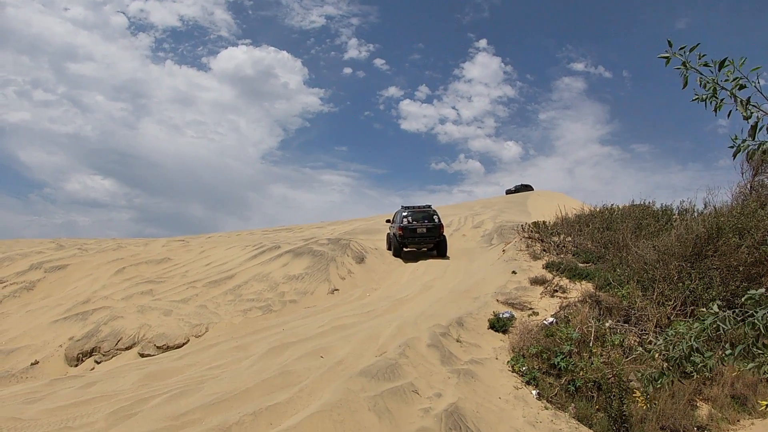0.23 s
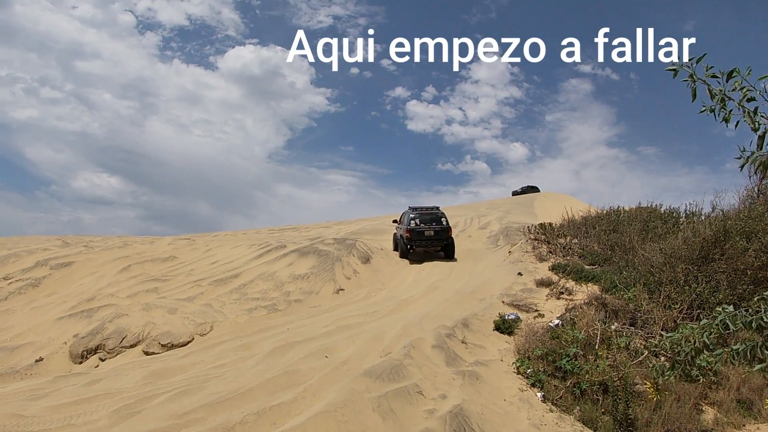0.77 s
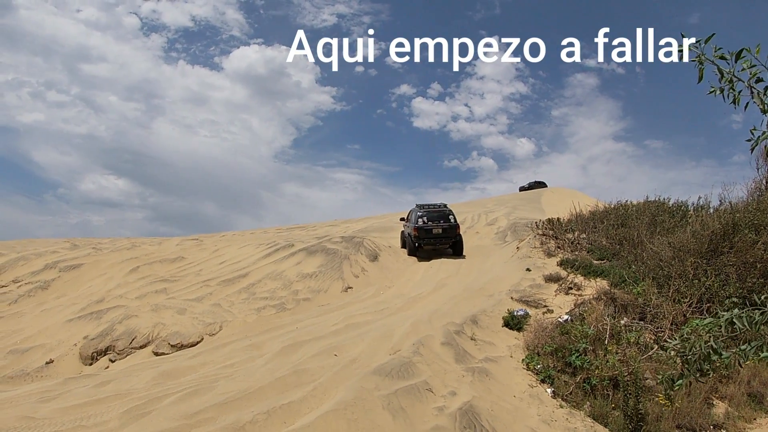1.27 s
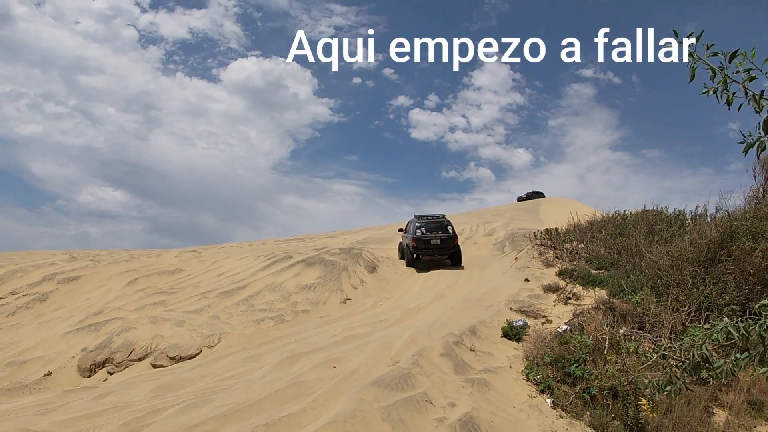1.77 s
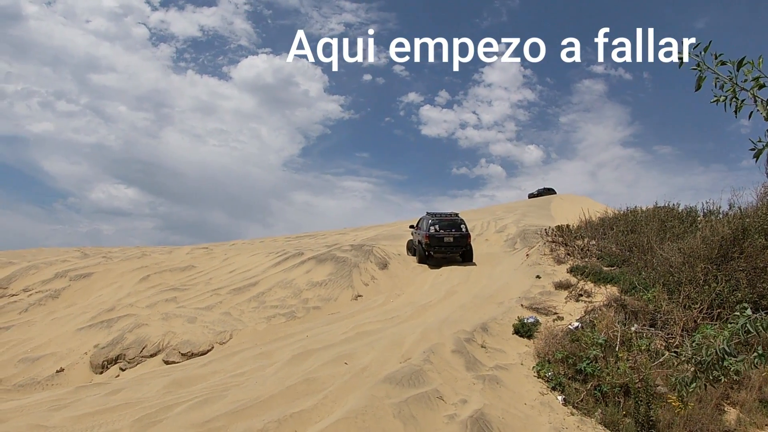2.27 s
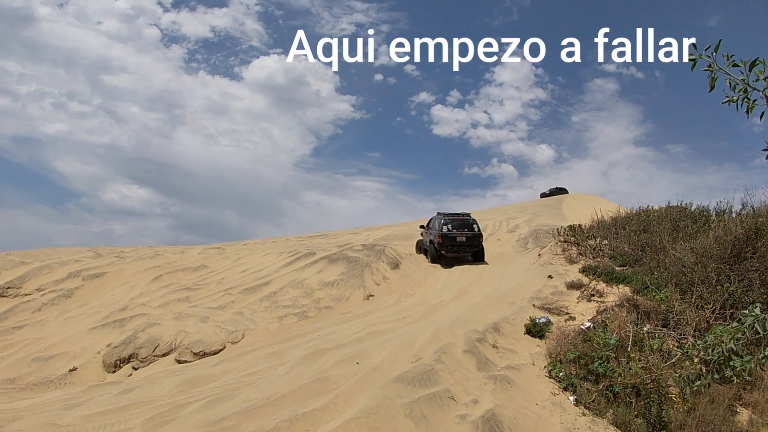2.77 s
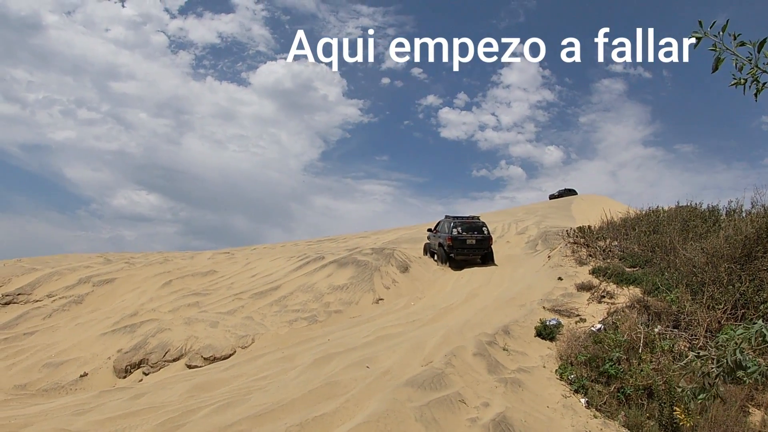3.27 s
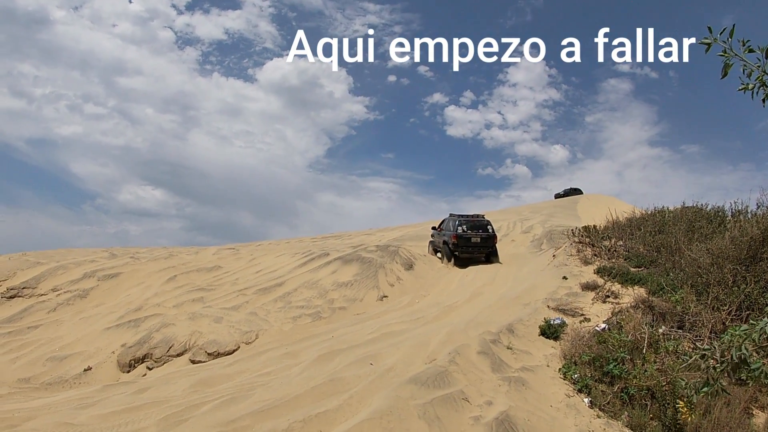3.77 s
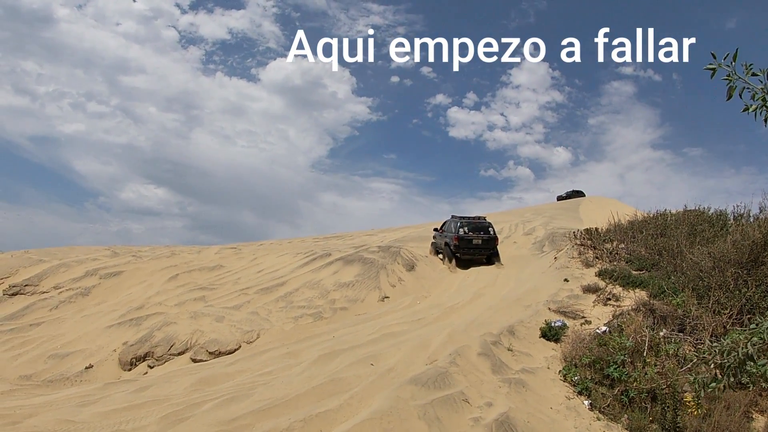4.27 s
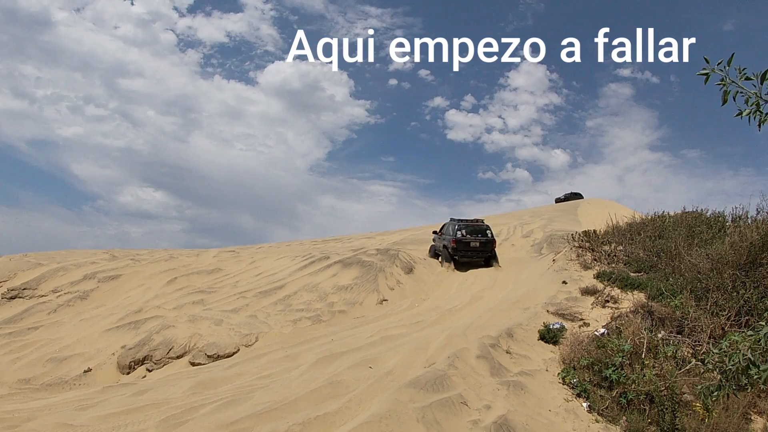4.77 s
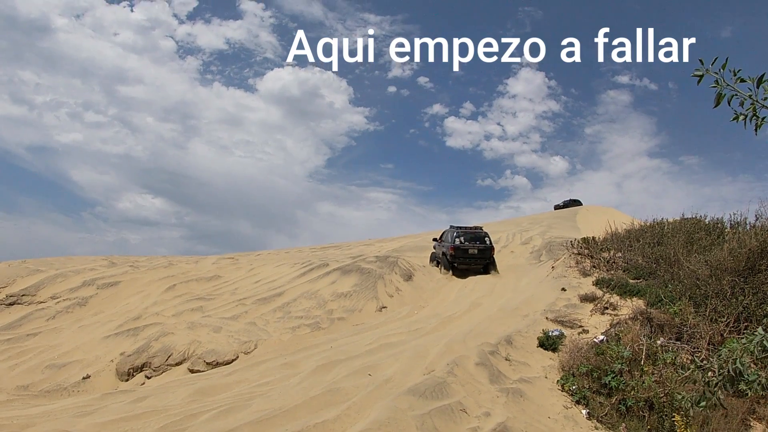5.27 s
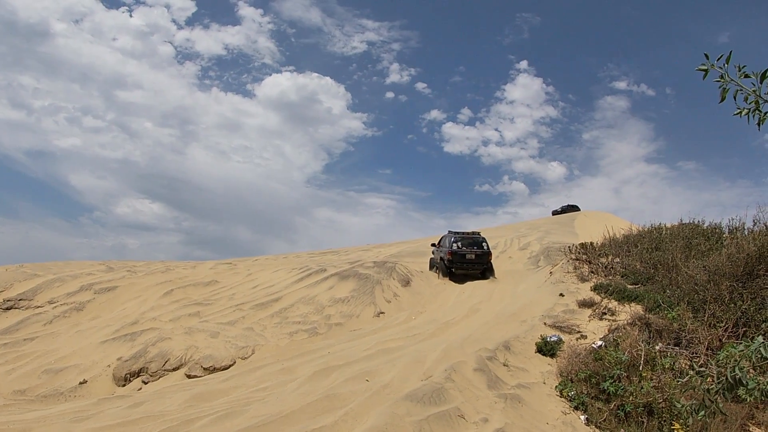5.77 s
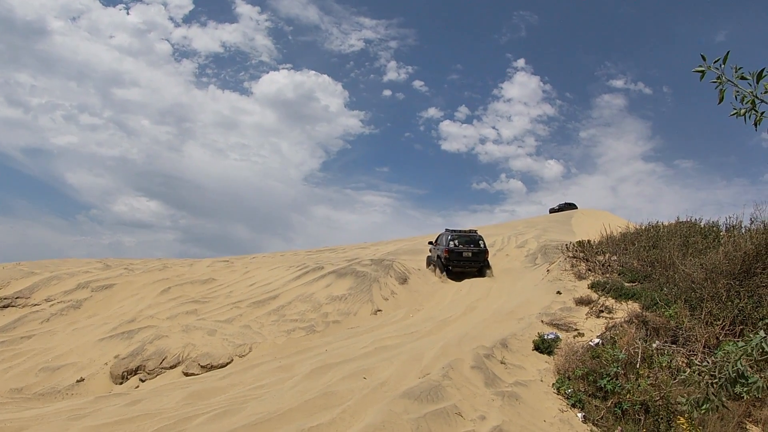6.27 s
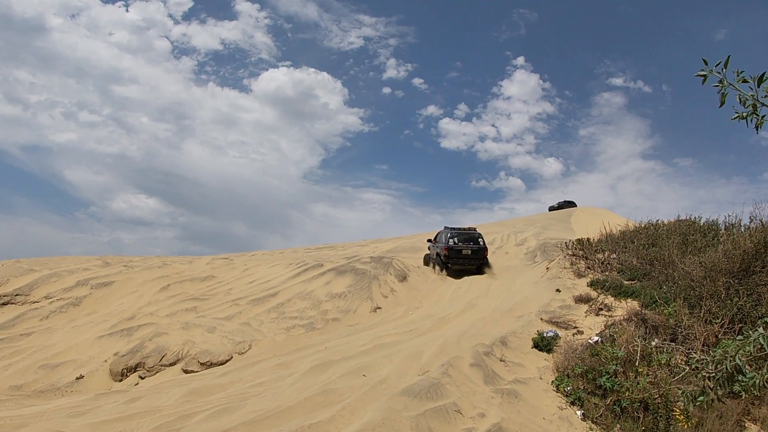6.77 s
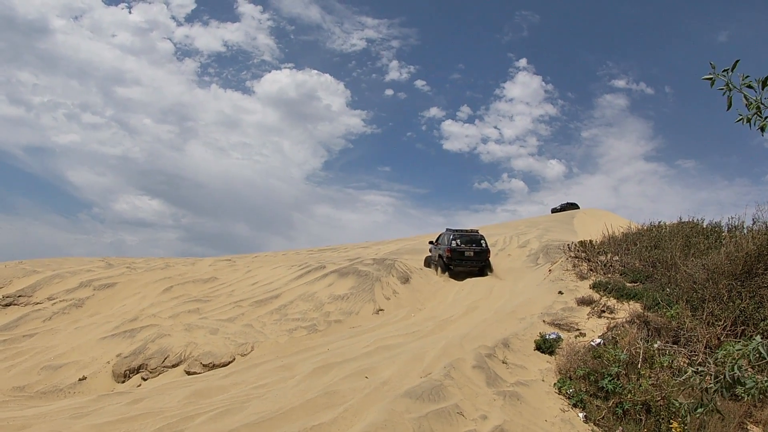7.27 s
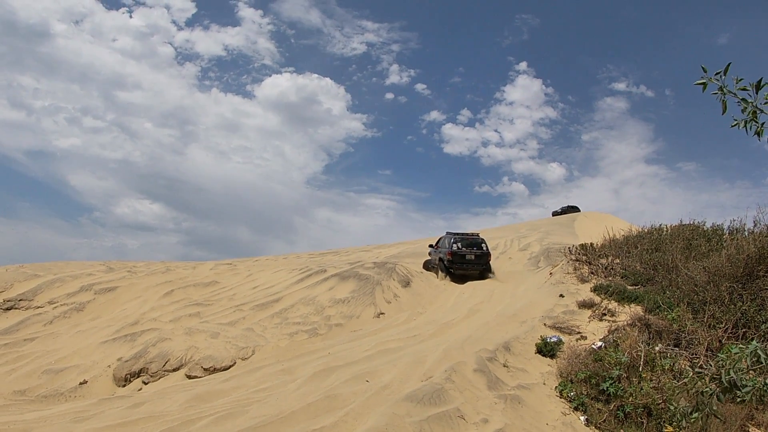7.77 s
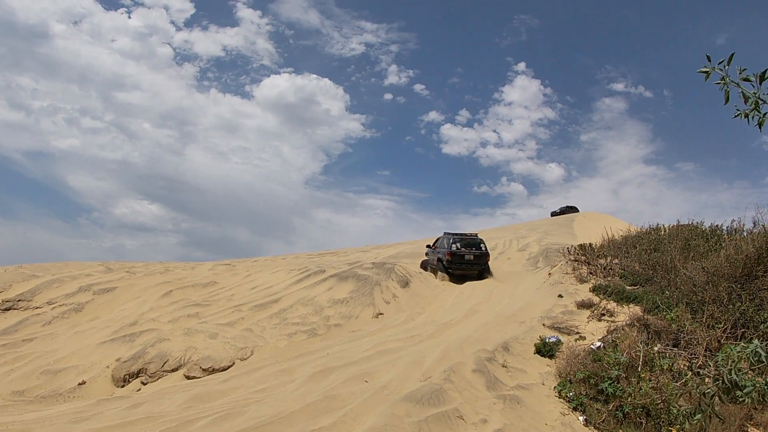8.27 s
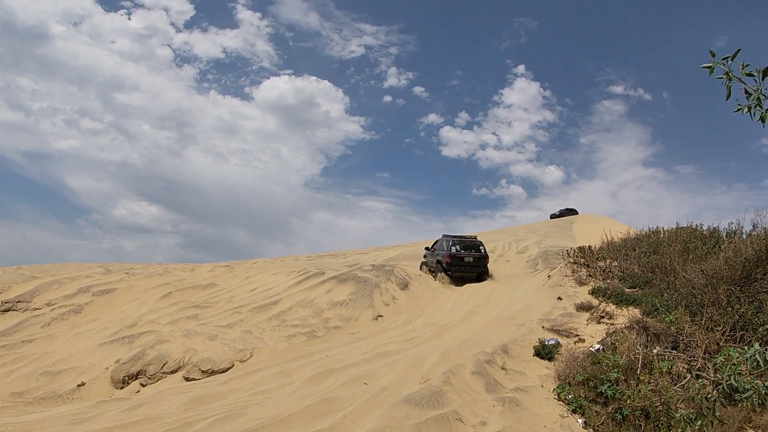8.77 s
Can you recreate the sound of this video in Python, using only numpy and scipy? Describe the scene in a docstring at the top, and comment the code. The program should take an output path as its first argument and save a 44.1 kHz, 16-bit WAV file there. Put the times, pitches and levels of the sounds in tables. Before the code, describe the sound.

A big engine growls low amid body knocks, climbs in pitch, starts misfiring at three seconds, and holds a rough, popping roar over sand.

```python
"""Off-roader climbing a dune

An eight-cylinder engine, heard from on board, lugs over a few bumps, then revs up and is held high.
Firing pulses ring the pipe as boom and rasp; from about three seconds one cylinder misfires, so the
boom stutters once a cycle, with a growl of cycle overtones and short noise pops.
Shaped noise and engine-cycle patterns make the rush and the hissing sand; faint wavering sines run along.
Damped sines thump the body over rumbling noise; noise bursts are twigs and grit ticking on it."""
import sys
import numpy as np
from scipy import signal
from scipy.fft import rfft, irfft
from scipy.io import wavfile
from scipy.ndimage import uniform_filter1d

SR = 44100
rng = np.random.default_rng(int(sys.argv[2]) if len(sys.argv) > 2 else 0)


def output_pcm(signal):
    """Save a mono or channel-first signal as 16-bit PCM at the path in sys.argv[1].

    Samples are clipped to [-1, 1] before scaling.
    """
    pcm = np.clip(np.atleast_2d(signal).T, -1, 1) * 32767
    wavfile.write(sys.argv[1], SR, np.round(pcm).astype(np.int16))


N = 398223
TIME = np.arange(N) / SR

# engine speed over the climb: t/s, firing rate f/Hz
FIRING = [(0.0, 47.03), (0.16, 44.68), (0.63, 51.29), (1.32, 47.23), (1.7, 55.04), (2.0, 82.95),
          (2.46, 81.6), (2.94, 102.13), (3.83, 139.88), (4.33, 144.89), (4.92, 142.87), (5.53, 146.77),
          (5.66, 128.92), (6.06, 150.77), (6.54, 155.72), (7.25, 155.16), (8.15, 151.84), (9.03, 161.55)]
CRUISE_HZ = 150  # firing rate at cruising revs


def firing_rate():
    """Firings per second: every cylinder's combustion counts once."""
    return curve(FIRING)


def octaves():
    """Engine speed in octaves above cruising revs."""
    return np.log2(firing_rate() / CRUISE_HZ)


# one cylinder fails quickly, then slowly gets worse (depth: 0 healthy, 1 failing)
FAULT_START_S, FAULT_ONSET_S, FAULT_DEPTH, FAULT_GROWTH_PER_S = 3.06, 0.26, 0.99, 0.035


def misfire():
    """Depth of the misfire: a quick onset, then slow growth."""
    since = TIME - FAULT_START_S
    onset = np.clip(since / FAULT_ONSET_S, 0, 1)
    return onset * (FAULT_DEPTH + FAULT_GROWTH_PER_S * since)


# the engine briefly loses power: t/s, half width/s, drop in level/dB
STUMBLES = [(1.69, .035, 3.5), (5.645, .08, 3.5)]


def stumble_db():
    """Power lost in the stumbles, as a level change in dB."""
    return -sum(db * swell(s, width) for s, width, db in STUMBLES)


# cylinders in firing order: lateness/firing intervals, healthy pulse size, failing pulse size,
# failing rasp level/dB (sizes and levels relative to each other)
CYLINDERS = [(.01, .93, .61, -2), (0, 1.18, .87, -4), (-.02, .87, 1.0, -8), (-.01, 1.0, .9, -6),
             (-.02, 1.02, -.3, -18), (.055, .88, 1.04, 3), (-.01, .93, .36, 1), (-.015, 1.07, 1.31, -1)]


def firings(crank, healthy, failing, shape, scatter):
    """One pulse a firing, sized by its cylinder and by chance; neighbours overlap."""
    late, fault = np.array(CYLINDERS)[:, 0], misfire()
    chance, out = rng.standard_normal(N), np.zeros(N)
    for step in (-1, 0, 1):
        number = np.floor(crank).astype(int) + step
        cylinder = number % len(late)
        size = healthy[cylinder] + fault * (failing - healthy)[cylinder]
        pulse = shape(crank - number - late[cylinder])
        out += size * (1 + scatter * chance[number]) * pulse
    return out


# resonance of exhaust pipe and cab: f/Hz, relative level/dB
PIPE = [(15, -40.5), (35, -7.5), (55, -1), (80, 0.5), (115, 6.5), (150, 4), (195, -6), (225, -10),
        (260, -29.5), (300, -50.5), (420, -89.5), (700, -100)]
# the boom grows with the revs until the engine pulls at full load, where it has BOOM_DB
BOOM_DB, BOOM_DB_PER_OCTAVE, FULL_LOAD_HZ = -14.8, 6.5, 103


def exhaust_boom(crank, blowdown=0.11, uneven=0.04):
    """Blow-down pulses ring the pipe and cab; combustion is less even at low speed."""
    _, healthy, failing, _ = np.transpose(CYLINDERS)
    speed = firing_rate()

    def blow(u):  # u and blowdown in firing intervals
        return np.maximum(u, 0) * np.exp(-abs(u) / blowdown)

    pulses = firings(crank, healthy, failing, blow, uneven * speed.max() / speed)
    boom = steady(colour(pulses - pulses.mean(), PIPE))
    below_full_load = np.minimum(np.log2(speed / FULL_LOAD_HZ), 0)
    return amp(BOOM_DB + BOOM_DB_PER_OCTAVE * below_full_load + stumble_db()) * boom


# tone of the rasp: f/Hz, relative level/dB
RASP = [(160, -36.5), (270, -12), (340, -6.5), (420, -2), (490, -5), (580, -1), (660, -2), (800, -17.5),
        (920, -12), (1080, -14.5), (1230, -22), (1520, -11.5), (1760, -22.5), (2050, -17.5), (2350, -24),
        (2600, -20), (3600, -32)]
# base level at cruising revs and its growth with the revs
RASP_DB, RASP_DB_PER_OCTAVE = -46.5, 2.0


def exhaust_rasp(crank, lag=0.847, front_width=0.1, puff_width=0.4, front_db=-3, puff_db=-3,
                 healthy_db=-6.0, scatter=0.26, low_hz=430, stumble_share=1.3, drift_db=0.57):
    """Each pulse has a steep front and a puff of turbulence; the one after the misfire cracks loudest."""
    _, healthy, _, rasp_db = np.transpose(CYLINDERS)
    failing = amp(rasp_db)

    def hump(width):  # lag and widths in firing intervals
        return lambda u: np.exp(-(u / width) ** 2)

    def pipe(x):
        return steady(colour(band(x, low_hz, 5200), RASP + [(8000, -71)]))

    front = firings(crank - lag, healthy, failing, hump(front_width), scatter / 2)
    puff = firings(crank - lag - puff_width, healthy, failing, hump(puff_width), scatter)
    turbulence = puff * rng.standard_normal(N)
    level = RASP_DB + RASP_DB_PER_OCTAVE * octaves() + healthy_db * (1 - misfire())
    level = level + stumble_share * stumble_db() + drift_db * wander(4)
    return amp(level) * (amp(front_db) * pipe(front) + amp(puff_db) * pipe(turbulence))


# overtones of the failing engine: multiple of the cycle rate, relative level/dB
GROWL = [(10, -33), (11, -42.5), (12, -47.5), (13, -45.5), (14, -56.5), (18, -51.5), (19, -55), (21, -54),
         (22, -52), (23, -55), (28, -59.5), (30, -59), (31, -62.5), (32, -60.5), (33, -62), (35, -60.5)]
# gain at cruising revs and its growth with the revs
GROWL_DB, GROWL_DB_PER_OCTAVE = 1.5, 17


def growl(crank, crack=6.7, smear=0.0836, steepness=1.2, flutter=0.09):
    """The misfire repeats every cycle and gives clean overtones, which the pipe smears in time."""
    cycle = (crank - crack) / len(CYLINDERS)
    tones = sum(amp(db) * np.cos(2 * np.pi * k * cycle - smear * (k - 20) ** 2) for k, db in GROWL)
    level = GROWL_DB + GROWL_DB_PER_OCTAVE * octaves() + stumble_db()
    depth = np.maximum(misfire(), 0) ** steepness
    return amp(level) * tones * depth * (1 + flutter * wander(16))


# loudest pops of unburnt fuel in the pipe: t/s, peak level of the burst/dB
POPS = [(3.335, -35), (3.592, -28), (3.653, -31), (4.782, -34), (4.893, -35), (5.337, -36), (5.854, -29.5),
        (6.074, -32), (6.336, -31), (6.748, -28), (6.903, -30.5), (7.576, -32), (8.36, -32)]
# any misfire may give a smaller pop, always at the same point of the cycle (counted in firings)
POP_CHANCE, POP_FIRING, POP_DB, POP_SPREAD_DB = 0.5, 6.1, -36.5, 1.8


def pops(crank, length=0.03, crackle=0.1, decay=0.0044):
    """A short burst in the pipe's mid resonance, with crackle on top; small ones follow misfires by chance."""
    out, t = np.zeros(N), np.arange(round(length * SR)) / SR
    cycle = np.floor((crank - POP_FIRING) / len(CYLINDERS))
    failing = TIME[1:] > FAULT_START_S + FAULT_ONSET_S
    at = np.flatnonzero((np.diff(cycle) > 0) & failing)
    size_db = POP_DB + stumble_db() + POP_SPREAD_DB * rng.standard_normal(N)
    at = at[rng.random(N)[at] < POP_CHANCE]
    for s, db in POPS + list(zip(TIME[at], size_db[at])):
        burst = band(rng.standard_normal(len(t)) * np.exp(-t / 0.002), 440, 700)
        grit = unit(band(rng.standard_normal(len(t)), 510, 2200)) * np.exp(-t / decay)
        add(out, s, amp(db) * (burst / abs(burst).max() + crackle * grit))
    return out


def machinery(crank, size=8192, spread_db=7.0, shimmer=0.5):
    """Valves and gears repeat every engine cycle: hundreds of random, unequal overtones of the cycle rate."""
    patterns = []
    for _ in range(2):
        spread = unit(uniform_filter1d(rng.standard_normal(size // 2 + 1), size=3))
        heights = amp(spread_db * spread)
        heights[size // 9:] = 0
        phases = np.exp(2j * np.pi * rng.random(len(heights)))
        cycle = irfft(heights * phases)
        place = crank / len(CYLINDERS) * size
        patterns.append(unit(np.interp(place, np.arange(size), cycle, period=size)))
    return unit(patterns[0] + shimmer * wander(3.1) * patterns[1])


# tone of the rush: f/Hz, relative level/dB
RUSH = [(150, -17), (260, -3), (350, 2.8), (500, -7.5), (700, -10.5), (950, -10), (1200, -10), (1600, -12),
        (2050, -12), (2600, -16), (3000, -26), (3400, -26), (4000, -25), (4500, -28), (5000, -28),
        (5700, -34), (7500, -39.5)]
# course of the tyre and engine bay rush, before the offsets in rush(): t/s, level/dB
RUSH_LEVEL = [(0.0, -46.5), (0.05, -51.5), (0.57, -55.5), (1.17, -52), (1.2, -48.5), (1.44, -51.5),
              (3.06, -57.5), (3.91, -53.5), (5.68, -54), (5.91, -52.5), (7.5, -51.5), (8.15, -49),
              (8.95, -51)]


def rush(crank, level_db=4.5, masked_db=-2.6, flutter_db=1.0, gears_db=-4, stumble_share=0.46):
    """Fan and tyres make a wide, slightly fluttering rush, with the whirr of the engine's moving parts."""
    level = curve(RUSH_LEVEL) + level_db + masked_db * misfire()
    level = level + stumble_share * stumble_db() + flutter_db * wander(27)
    air = unit(colour(rng.standard_normal(N), RUSH))
    whirr = steady(band(machinery(crank), 460, 6000, order=1))
    whirr = steady(colour(whirr, RUSH))
    return amp(level) * unit(air + amp(gears_db) * whirr)


# tone of the sand: f/Hz, relative level/dB
SAND = [(2000, -25), (3000, -4.5), (3700, -8.5), (4700, -2), (6300, -0.5), (7400, -11.5), (8200, -6.5),
        (9000, -3.5), (9900, -14), (10800, -27)]
# the hiss follows rush and revs: SAND_DB is its base at cruising revs and the usual rush
SAND_DB, SAND_PER_RUSH, SAND_DB_PER_OCTAVE, USUAL_RUSH_DB = -65.5, 0.85, 2.4, -53
# one thicker spray of sand
SPRAY_S, SPRAY_WIDTH_S, SPRAY_DB = 8.35, 0.08, 4


def sand(crank, grain_db=2.0, flutter_db=1.1, gears_db=-4.5):
    """Tyres throw sand, a dense hiss of unequal grains; a pattern repeating with the engine cycle runs in it."""
    grains = unit(rng.standard_normal(N) * amp(grain_db * rng.exponential(1, N)))
    hiss = steady(colour(grains + amp(gears_db) * machinery(crank), SAND))
    level = SAND_DB + SAND_PER_RUSH * (curve(RUSH_LEVEL) - USUAL_RUSH_DB)
    level = level + SAND_DB_PER_OCTAVE * octaves()
    level = level + SPRAY_DB * swell(SPRAY_S, SPRAY_WIDTH_S) + flutter_db * wander(34)
    return amp(level) * hiss


# body thumps over ruts: t/s, peak level of the envelope/dB, pitch f/Hz, rise time/s
THUMPS = [(.087, -11.5, 167, 0.0021), (.102, -9, 126, 0.0063), (0.136, -10, 55, .0075),
          (0.157, -28.5, 247, 0.011), (0.269, -10, 43.2, 0.01), (0.32, -10.5, 154, .0022),
          (0.651, -32, 253, 0.0096), (0.727, -24, 229, 0.0031), (.816, -20, 204, 0.0022),
          (1.583, -24.5, 216, 0.0082), (2.973, -36, 310, .012)]


def body_thumps(length=0.09, rattle=0.28, rattle_decay=0.0063, trim_hz=200):
    """Ruts knock the body into short damped tones and shake its trim, more so at higher pitch."""
    out, t = np.zeros(N), np.arange(round(length * SR)) / SR
    for s, db, hz, rise in THUMPS:
        blow = t / rise * np.exp(1 - t / rise) * np.sin(2 * np.pi * hz * t)
        trim = unit(band(rng.standard_normal(len(t)), 210, 450, order=3))
        trim = trim * np.exp(-t / (rise + rattle_decay))
        add(out, s, amp(db) * (blow + rattle * (hz / trim_hz) ** 3 * trim))
    return out


# tone of the rumble: f/Hz, relative level/dB
RUMBLE = [(8, -14), (25, -4.5), (45, -5.5), (90, -9), (170, -12.5), (260, -25.5), (500, -56.5), (1000, -89)]
# course of the rumble over the first bumps, before rumble_db is added: t/s, level/dB
SHAKE = [(0.0, -33), (0.37, -29), (0.46, -40.5), (0.83, -31.5), (0.99, -53), (1.59, -32.5), (2.45, -50)]
SMOOTH_RUMBLE_DB = -39.5  # floor on smooth sand


def body_rumble(rumble_db=6):
    """The body rumbles on the sand as low noise, stronger over the first bumps."""
    level = np.maximum(curve(SHAKE) + rumble_db, SMOOTH_RUMBLE_DB)
    return amp(level) * unit(colour(rng.standard_normal(N), RUMBLE))


def ticks(events, low_hz, length=0.08, crack=60, brittle=0.0015):
    """Decaying noise in each event's own band; the shortest are a single sharp crack."""
    out, t = np.zeros(N), np.arange(round(length * SR)) / SR
    for s, db, decay, high_hz in events:
        impulse = (t == 0) * crack * np.exp(-decay / brittle)
        force = rng.standard_normal(len(t)) * np.exp(-t / decay) + impulse
        snap = band(force, low_hz, high_hz)
        add(out, s, amp(db) * snap / abs(snap).max())
    return out


# twigs scrape along the body: t/s, peak level/dB, decay/s, upper band edge f/Hz
SCRAPES = [(.928, -39, .007, 3200), (1.093, -42, .009, 3600), (1.191, -38.5, .029, 2800),
           (1.255, -39, 0.012, 4400), (1.327, -46, .02, 10000), (1.404, -44, .007, 6000),
           (1.948, -35.5, 0.015, 3200), (2.036, -49, 0.037, 10000), (2.1, -43, 0.009, 3800)]


def twig_scrapes():
    """Twigs rub the body in short, mostly mid-band noise bursts."""
    return ticks(SCRAPES, low_hz=1050)


# grit cracks on the body: t/s, peak level/dB, decay/s, upper band edge f/Hz
CRACKS = [(1.358, -18.5, 0.002, 6000), (2.9223, -25.5, .00065, 11000), (3.029, -30.5, 0.0014, 7400)]


def grit_cracks():
    """Hard grit hits the body in dry, bright snaps."""
    return ticks(CRACKS, low_hz=3800)


# faint whine: centre f/Hz, level/dB (sine peak before flutter and fade)
WHINE = [(774, -59.5), (1176, -67)]


def whine(waver=0.002, flutter=0.23, fade_db=-5):
    """Thin wavering tones that sink as the misfire sets in."""
    tones = np.zeros(N)
    for hz, db in WHINE:
        turns = np.cumsum(hz * (1 + waver * wander(9.6))) / SR
        tones += amp(db) * np.sin(2 * np.pi * turns)
    return tones * (1 + flutter * wander(6)) * amp(fade_db * misfire())


def amp(db):
    """Decibels to gain."""
    return 10 ** (np.asarray(db) / 20)


def unit(x):
    """Scales to rms 1."""
    return x / np.sqrt(np.mean(x ** 2) + 1e-20)


def curve(rows):
    """(t/s, value) points joined by straight lines in time."""
    return np.interp(TIME, *np.transpose(rows))


def swell(s, width):
    """A smooth bump of height 1 around time s."""
    return np.exp(-((TIME - s) / width) ** 2)


def wander(hz):
    """Slow chance of rms 1, up to about hz."""
    rolloff = 1 + (np.fft.rfftfreq(N, 1 / SR) / hz) ** 4
    return unit(irfft(rfft(rng.standard_normal(N)) / rolloff, N))


def band(x, low_hz, high_hz, order=2):
    """Band-pass."""
    edges = [low_hz, min(high_hz, SR / 2 - 1)]
    return signal.sosfilt(signal.butter(order, edges, "band", fs=SR, output="sos"), x)


def colour(x, points, size=16384):
    """Causal minimum-phase filter whose gain follows (f/Hz, level/dB) points on a log frequency axis."""
    hz, db = np.transpose(points)
    log_hz = np.log(abs(np.fft.fftfreq(size, 1 / SR)) + 1)
    log_gain = np.log(amp(np.interp(log_hz, np.log(hz + 1), db)))
    response = np.fft.ifft(np.exp(np.conj(signal.hilbert(log_gain)))).real
    return signal.oaconvolve(x, response[:size // 2])[:N]


def steady(x, size=7000):
    """Evens out the slow level and keeps the throb; size in samples."""
    power = uniform_filter1d(uniform_filter1d(x ** 2, size), size)
    return x / np.sqrt(power + 1e-12)


def add(mix, s, sound):
    """Mixes a sound in at time s."""
    part = mix[max(round(s * SR), 0):][:len(sound)]
    part += sound[:len(part)]


def scene():
    """The crank drives the exhaust layers and the machinery; the vehicle adds the rest."""
    crank = np.cumsum(firing_rate()) / SR  # counted in firings
    pipe_delay = 0.00089  # seconds
    exhaust = exhaust_boom(crank - pipe_delay * firing_rate()) + exhaust_rasp(crank)
    exhaust = exhaust + growl(crank) + pops(crank)
    vehicle = rush(crank) + sand(crank) + body_thumps() + body_rumble()
    details = twig_scrapes() + grit_cracks() + whine()
    return (exhaust + vehicle + details)[None]


def record(dry, edge_hz=10820):
    """A steep linear-phase low-pass limits the band of the whole mix."""
    lowpass = signal.firwin(301, edge_hz, window=("kaiser", 8), fs=SR)
    return signal.oaconvolve(dry, lowpass[None], "same")


dry = scene()
out = record(dry)
output_pcm(out)
```